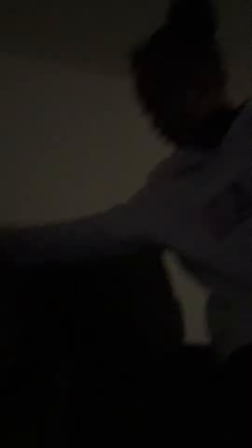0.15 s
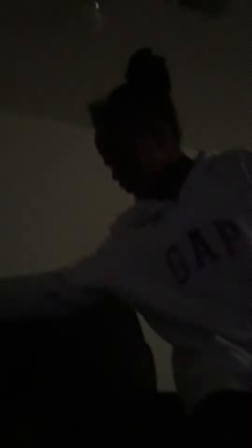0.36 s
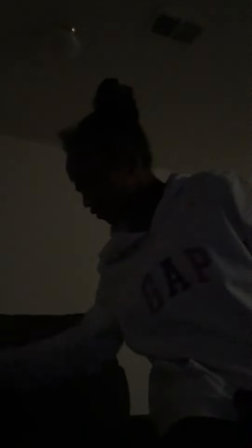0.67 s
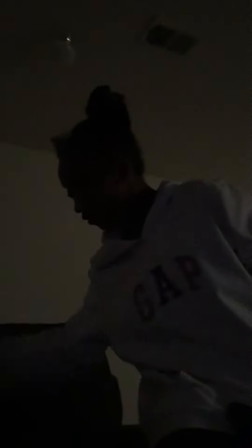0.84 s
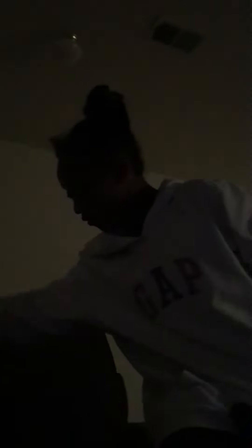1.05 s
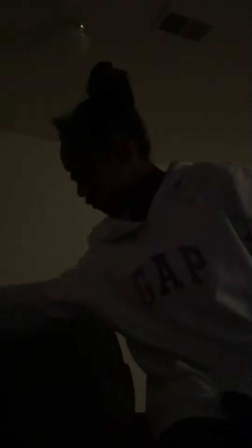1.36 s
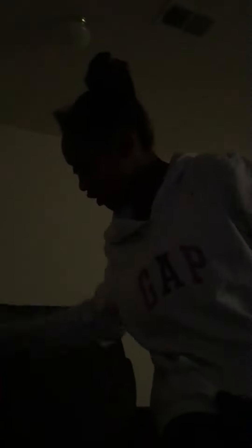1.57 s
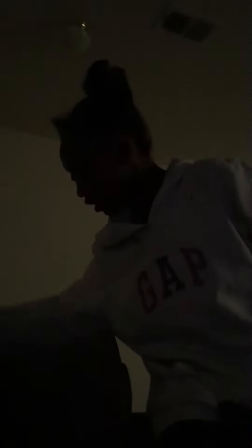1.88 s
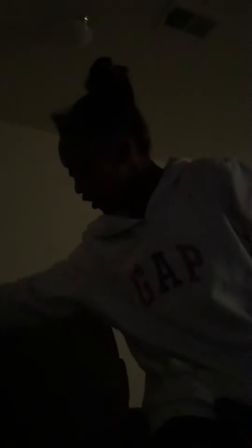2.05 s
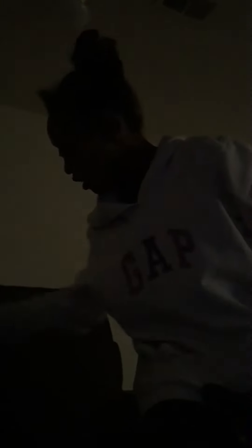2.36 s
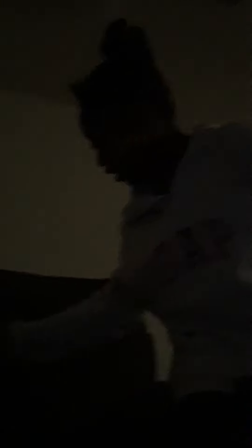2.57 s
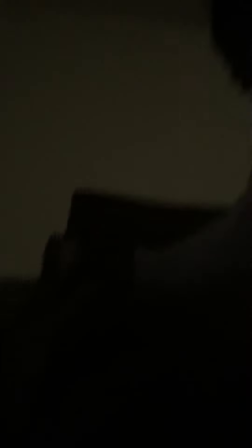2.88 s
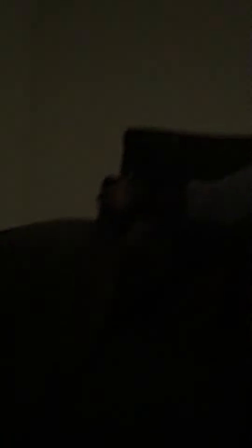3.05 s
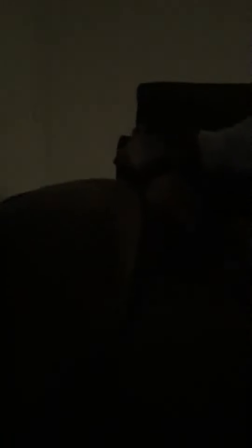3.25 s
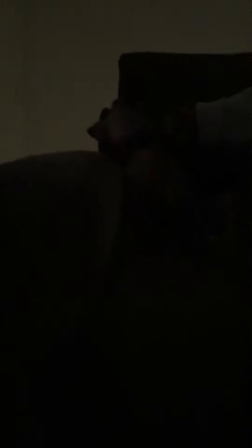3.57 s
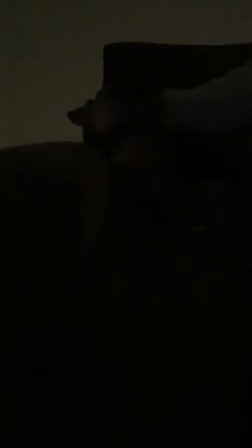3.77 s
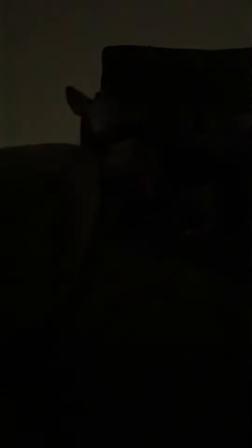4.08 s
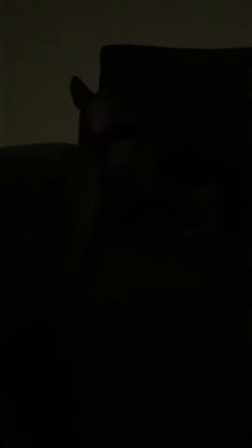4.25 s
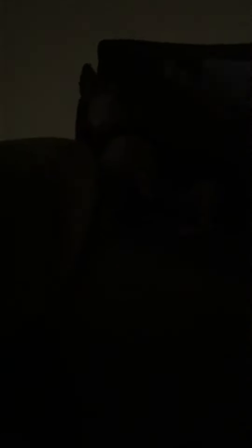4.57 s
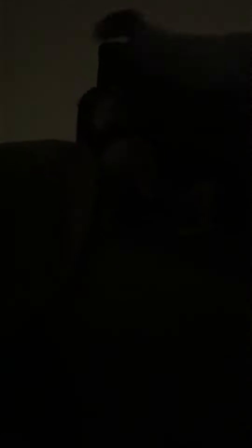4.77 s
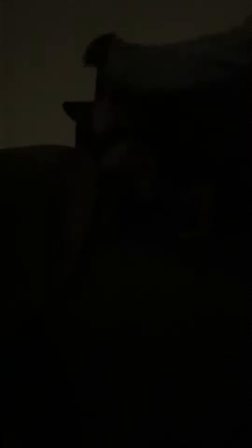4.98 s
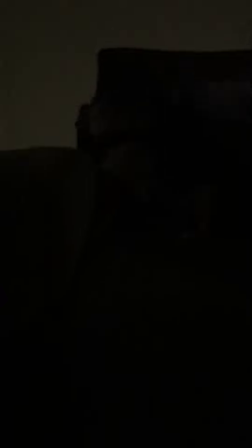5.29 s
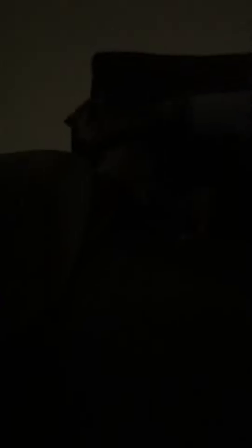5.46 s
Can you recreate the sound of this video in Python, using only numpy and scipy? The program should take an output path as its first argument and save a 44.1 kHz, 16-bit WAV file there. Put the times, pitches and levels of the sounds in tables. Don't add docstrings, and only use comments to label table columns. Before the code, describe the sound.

A small rubber squeaky toy is squeezed ten times in a quiet room, first in quick regular squeaks, then spaced apart, with soft fabric rustling.

```python
import sys
import numpy as np
from scipy import signal
from scipy.fft import rfft, irfft, next_fast_len
from scipy.io import wavfile
from scipy.ndimage import uniform_filter1d, map_coordinates

SR = 44100
rng = np.random.default_rng(int(sys.argv[2]) if len(sys.argv) > 2 else 0)


def generate_wav(signal):
    frames = np.transpose(np.atleast_2d(signal))
    scaled = np.clip(frames, -1, 1) * 32767
    pcm = np.round(scaled).astype(np.int16)
    wavfile.write(sys.argv[1], SR, pcm)


def invert_db(x):
    u = np.asarray(x, float) / 20
    return 10 ** u


N = 248150


def unit(x):
    return x / np.sqrt(np.mean(x ** 2) + 1e-20)


def along(points, hz):
    f, v = np.transpose(points)
    return np.interp(np.log(hz + 1), np.log(f + 1), v)


def wobble(rate, size=N):
    knots = rng.standard_normal(size // 40 + 4)
    return map_coordinates(knots, [np.arange(size) * rate / SR])


def filtered(x, response):
    m = next_fast_len(len(x) + 8192)
    return irfft(rfft(x, m) * response(np.fft.rfftfreq(m, 1 / SR)), m)[:len(x)]


def noise(spectrum):
    return unit(filtered(rng.standard_normal(N), lambda hz: invert_db(along(spectrum, hz))))


def strokes(rows):
    middle, length, *levels = np.transpose(rows)[:, :, None]
    t = np.arange(0, N + 64, 64) / SR
    fall_db = 13 * (2 * (t - middle) / length) ** 2
    curves = []
    for db in levels:
        power = np.sum(invert_db(2 * (db - fall_db)), axis=0)
        curves.append(np.interp(np.arange(N) / SR, t, np.sqrt(power)))
    return curves


def hiss_floor():
    # f/Hz, density/dB per Hz
    floor = [(90, -30), (130, -2.5), (190, -2), (300, -5), (600, -12), (1100, -10.5), (2500, -17),
             (3500, -20), (5000, -26.5), (6300, -25), (8000, -31.5), (10500, -32.5), (13500, -27.5),
             (16000, -36.5)]
    return invert_db(-58) * noise(floor)


def appliance():
    # f/Hz, rms level/dB, waver/Hz
    hum = [
        (104.4, -54, 1.1),
        (187.4, -69.5, 1.3),
        (231, -70, 2.5),
        (289, -73, 5.6),
        (474, -72.5, 1.5),
    ]
    # f/Hz, density/dB per Hz
    rumble = [(20, -28), (32, -10.5), (45, -8.5), (58, 2), (70, 2.5), (85, -4.5), (120, -45.5)]
    # middle t/s, length/s, level/dB
    swells = [
        (.65, .6, -53.5),
        (2.48, 0.1, -47),
        (2.85, 0.45, -54),
        (3.25, 0.42, -52.5),
        (5.2, 0.82, -49.5),
    ]
    lines = np.zeros(N)
    for hz, db, waver in hum:
        phase = 2 * np.pi * np.cumsum(hz + waver * wobble(8.2)) / SR
        lines += np.sqrt(2) * invert_db(db + 1.1 * wobble(10)) * np.sin(phase)
    rumble_gain = np.hypot(invert_db(-56), strokes(swells)[0])
    return lines + rumble_gain * noise(rumble)


def ticks():
    # t/s, peak level/dB, centre f/Hz, width/Hz, t60/s
    contacts = [
        (2.029, -57.5, 402, 300, 0.042),
        (2.41, -52, 11100, 8870, 0.018),
        (2.483, -55.5, 7030, 3040, 0.024),
        (2.835, -53, 700, 499, 0.051),
        (2.909, -58, 11000, 9000, 0.022),
        (5.078, -45, 800, 600, 0.033),
        (5.24, -48.5, 9040, 7900, 0.089),
        (5.317, -55.5, 9030, 7450, 0.13),
    ]
    out, t = np.zeros(N + SR), np.arange(4096) / SR
    for s, db, hz, width, t60 in contacts:
        puff = unit(filtered(rng.standard_normal(len(t)),
                             lambda f: 1j * f * width / (hz * hz - f * f + 1j * f * width)))
        out[round(s * SR):][:len(t)] += invert_db(db - 60 * t / t60) * puff
    return out[:N]


def cloth():
    # f/Hz, density/dB per Hz
    rub_spectrum = [(500, -25.5), (800, -20), (1000, -5), (1280, -1), (1520, -2.5), (1830, -1), (2200, -10),
                    (2700, -20), (4000, -10), (5100, -19.5), (8000, -32)]
    fine_spectrum = [(2000, -35), (3000, 0.5), (5000, -8), (6300, -1.5), (10500, -8.5), (14000, -3),
                     (16000, -18)]
    dull_spectrum = [(450, -71), (700, -4.5), (1100, -1.5), (1500, -1.5), (1750, -3), (2000, -37),
                     (2800, -10), (5000, -34.5)]
    # middle t/s, length/s, rub level/dB, fine hiss level/dB
    sleeve_strokes = [(0, 0.29, -68, -67.5), (.48, 0.25, -51, -79), (.68, 0.16, -49.5, -67),
                      (.84, 0.14, -46.5, -68), (1.08, 0.14, -54, -112.5), (1.3, 0.25, -63, -56),
                      (1.43, 0.16, -54.5, -70), (1.6, 0.64, -67.5, -69.5), (2.22, 0.19, -51, -71),
                      (2.38, 0.9, -64.5, -70), (4.08, 0.31, -88, -61), (4.21, 0.11, -75, -64.5),
                      (4.3, .1, -71, -75), (4.4, 0.28, -70, -63.5), (4.58, 0.15, -61, -58.5),
                      (4.73, 0.22, -72, -67.5), (4.9, .3, -65, -70), (5.26, .09, -73.5, -57),
                      (5.46, 0.19, -61.5, -63), (5.63, 0.22, -61, -50)]
    # middle t/s, length/s, level/dB
    slides = [
        (3.13, 0.33, -53),
        (3.36, .2, -60.5),
        (4.31, 0.16, -61.5),
        (4.55, .25, -63),
    ]
    rub, fine = strokes(sleeve_strokes)
    coarse = rub * invert_db(2.5 * wobble(30)) * noise(rub_spectrum)
    hiss = fine * invert_db(2.8 * wobble(40)) * noise(fine_spectrum)
    slide = strokes(slides)[0] * invert_db(0.82 * wobble(18)) * noise(dull_spectrum)
    return coarse + hiss + slide


def near_walls(x):
    # f/Hz, level/dB
    near = [(1000, -3), (3000, -9), (6000, -8), (9000, -7.5), (15000, -10.5)]
    delays = rng.uniform(.0012, 0.027, size=9)
    copies = np.zeros(SR // 20)
    copies[(delays * SR).astype(int)] = invert_db(-300 * delays) * rng.choice([-1, 1], size=9)
    echo = signal.fftconvolve(x, copies / np.linalg.norm(copies))
    return filtered(echo, lambda hz: invert_db(along(near, hz)))


def room(x, share_db, bright_db):
    # f/Hz, t60/s
    decay_time = [(1000, 0.21), (1600, 0.39), (3000, 0.41), (6000, 0.32), (9000, 0.3), (15000, 0.11)]
    # f/Hz, level/dB
    tail_colour = [(1400, 7), (3000, -1.5), (6200, 4.5), (9000, 1), (15000, -1)]
    # f/Hz, level/dB
    wet_share = [(1500, -14.5), (6000, -12.5), (13000, -7)]
    hz, t, z = signal.stft(rng.standard_normal(SR // 2), SR, nperseg=256)
    fall_db = -60 * t / along(decay_time, hz)[:, None]
    decay = invert_db(fall_db) + invert_db(-17.0 + 0.45 * fall_db)
    colour = invert_db(along(tail_colour, hz)[:, None])
    tail = signal.istft(z * colour * decay, SR, nperseg=256)[1]
    tail = tail * (1 - np.exp(-np.arange(len(tail)) / SR / 0.011))
    wet = signal.fftconvolve(x, tail / np.linalg.norm(tail))
    return filtered(wet, lambda f: invert_db(share_db + bright_db * np.log2((f + 1) / 5000) + along(wet_share, f)))


def pressure(t, hold, first_hz, middle_hz, last_hz, flat, release, fall, swell_db, vent_db):
    u = np.clip(t / hold, 0, 1)
    arch = (2 * middle_hz - first_hz - last_hz) * 2 * u * (1 - u)
    held = first_hz + (last_hz - first_hz) * u + arch
    seat_s = .005 * (10 * flat) ** 2
    seat = np.clip(1 - t / seat_s, 0, 1) ** 1.3
    after = np.clip((t - hold) / release, 0, 1.3)
    pitch = held * (1 - flat * seat) * (1 - fall * after ** 1.3)
    level_db = swell_db * u - seat - vent_db * after
    return pitch, level_db, hold + release


def grip_colour(hz, grip_db):
    # f/Hz, level/dB
    hand = [(1400, 5), (2800, 1), (4400, 6), (6200, 0.5), (7800, -4.5), (9800, -0.5), (12600, 2),
            (14200, 3)]
    # f/Hz, width/octaves
    outlets = [
        (1400, 0.63),
        (2800, 0.5),
        (4400, 0.37),
        (9100, 0.36),
        (14300, 0.15),
    ]
    colour_db = along(hand, hz)
    for db, (centre, width) in zip(grip_db, outlets):
        colour_db = colour_db + db * np.exp(-(np.log2(hz / centre) / width) ** 2)
    return colour_db


def reed(squeeze, grip, shift, jitter, lead_s):
    # f/Hz, level/dB
    tube = [(1000, -9), (1400, -16), (2120, -3.5), (2800, -5.5), (4000, -15.5), (5000, -12), (5900, 3.5),
            (6400, 1.5), (7200, -5.5), (8800, -11), (11000, -17.5), (13000, -16.5), (14300, -13),
            (15600, -20)]
    t = np.arange(4096) / SR - lead_s
    pitch, level_db, length = pressure(t, *squeeze)
    pitch = uniform_filter1d(pitch, size=70)
    glide = np.maximum(-np.gradient(np.log(pitch)), 0) * SR
    pitch = pitch * (1 + (jitter + 0.00052 * glide) * wobble(900, size=4096))
    turns = np.cumsum(pitch) / SR
    k = np.arange(1, 16)[:, None]
    colour_db = along(tube, k * pitch / shift) + grip_colour(k * pitch, grip)
    flutter_db = 0.92 * np.sqrt(k) * np.array([wobble(150, size=4096) for _ in k])
    sizes = invert_db(colour_db + flutter_db) * (k * pitch < SR / 2)
    tone = np.sum(sizes * np.cos(2 * np.pi * k * turns - k * k * .045), axis=0)
    air = filtered(rng.standard_normal(len(t)), lambda hz: invert_db(along(tube, hz)))
    gate = np.clip(t / 0.0016, 0, 1) * np.clip((length - t) / 0.0018 + 1, 0, 1)
    stir_gain = invert_db(-29 + 2500 * np.minimum(t, 0)) * (t < .002)
    stir = stir_gain * (np.sin(2 * np.pi * turns) + np.sin(4 * np.pi * turns))
    return invert_db(level_db) * stir + gate * invert_db(level_db) * (tone + invert_db(-38.5) * air)


def toy():
    # t/s, hold/s, pitch at start, middle, end of the hold f/Hz
    squeezes = [(-.2, .04, 1370, 1406, 1336), (0.3273, .0325, 1583, 1567, 1587),
                (.754, .039, 1296, 1413, 1362), (1.242, .050, 1319, 1237, 1205),
                (1.682, .048, 1276, 1199, 1142), (2.122, 0.03, 1364, 1371, 1414),
                (2.56, .040, 1270, 1250, 1283), (2.948, 0.046, 1245, 1173, 1116),
                (3.817, .032, 1329, 1455, 1670), (4.887, .039, 1561, 1485, 1569),
                (5.5542, .032, 1481, 1798, 2268)]
    # level/dB, swell over the hold/dB, loss over the release/dB,
    # room share/dB, room brightness/dB per octave
    places = [(-24, -2.5, 5, 3, -2), (-13.5, -3, 8, 0, -2), (-20, -1.5, 6, -1.5, 0),
              (-16, -11, 7.5, -1, -1.5), (-26, -8.5, 13, 1.5, -0.5), (-20.5, -0.5, 6, 2, 1.5),
              (-32.5, 0, 10.5, 2.5, 1), (-29, -9, 9, -1, -1), (-24, 5, 15.5, -2, 1),
              (-20, -0.5, 10.5, 0, 0), (-11, 6.5, 19, -8, -4)]
    grips = [(-20, -1.5, -6.5, -3, -3), (-6.5, -1.5, -1.5, -3.5, -7.5), (-1, 1, -1, -5.5, 5),
             (-4, -8, -0.5, -4.5, -11), (1.5, 1.5, 3.5, -1, 7), (-0.5, 2, 5, -6, 3.5),
             (8.5, 5, 4, 6.5, 7.5), (8, 0.5, 1, 3.5, 4), (4, 11.5, 4, 4, 7.5), (-1, 2, 3, -2, 6),
             (-7, -4, -12.5, -7.5, -11)]
    # resonance shift factor, jitter share, flat start share,
    # release/s, pitch fall share
    strains = [(1.01, .004, .07, .01, .14), (0.994, 0.005, .16, 0.00923, 0.232),
               (1.048, 0.0021, 0.067, 0.0071, 0.11), (0.995, .0039, 0.088, 0.00675, 0.12),
               (0.988, 0.0074, .08, 0.0072, 0.048), (1.026, .0024, 0.05, 0.01, 0.14),
               (1.016, 0.0045, 0.078, 0.0091, 0.16), (.983, 0.0087, 0.051, .008, 0.055),
               (1.015, 0.012, .05, .013, 0.32), (0.973, 0.0096, .11, 0.019, .22),
               (1.034, .014, .04, 0.01, 0.21)]
    lead_s = .005
    out = np.zeros(N + 2 * SR)
    for (s, *squeeze), place, grip, (shift, jitter, *ends) in zip(squeezes, places, grips, strains):
        db, *air_db, room_db, bright_db = place
        start = SR + round((s - lead_s) * SR)
        squeak = invert_db(db) * reed(squeeze + ends + air_db, grip, shift, jitter, lead_s)
        for part in squeak, near_walls(squeak), room(squeak, room_db, bright_db):
            out[start:][:len(part)] += part
    return out[SR:][:N]


def scene():
    return (hiss_floor() + appliance() + ticks() + cloth() + toy())[None]


def band_limit(x):
    return signal.sosfilt(signal.butter(12, 16800, fs=SR, output="sos"), x)


def record(dry):
    lead_in = filtered(dry[0], lambda hz: np.exp(-((hz - 6400) / 700) ** 2))
    lead_in = np.pad(lead_in[960:], (0, 960))
    x = dry[0] + invert_db(-47.5 + 4 * wobble(500)) * lead_in
    x = x / (1 + np.abs(x / 1.1) ** 12) ** (1 / 12)
    x = filtered(x, lambda hz: invert_db(-60 * np.clip((hz - 15900) / 500, 0, 1)))
    return band_limit(x[None])


dry = scene()
out = record(dry)
generate_wav(out)
```